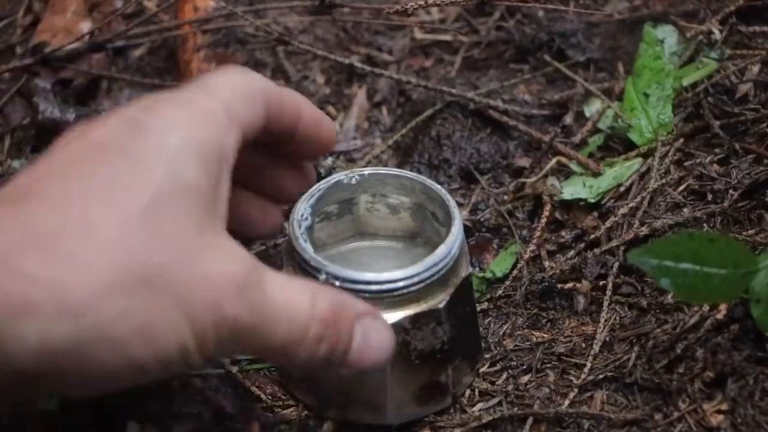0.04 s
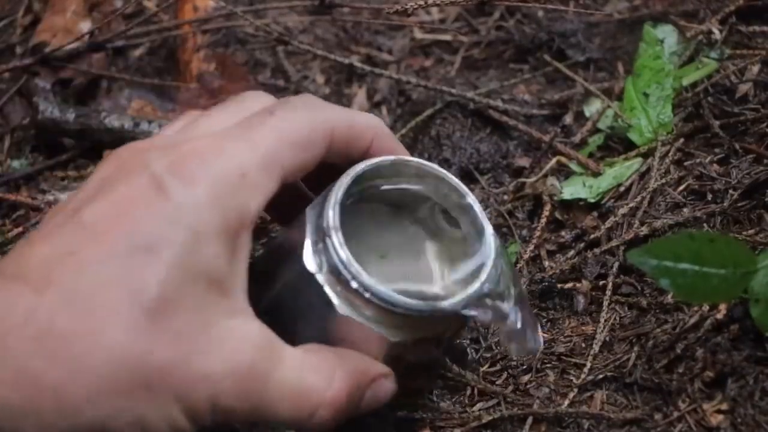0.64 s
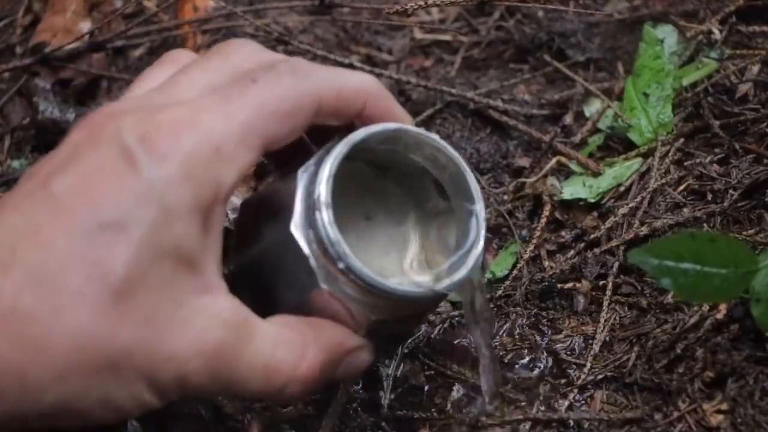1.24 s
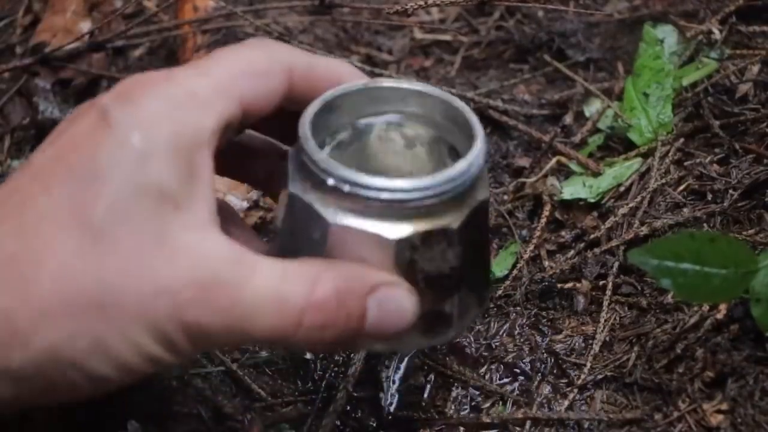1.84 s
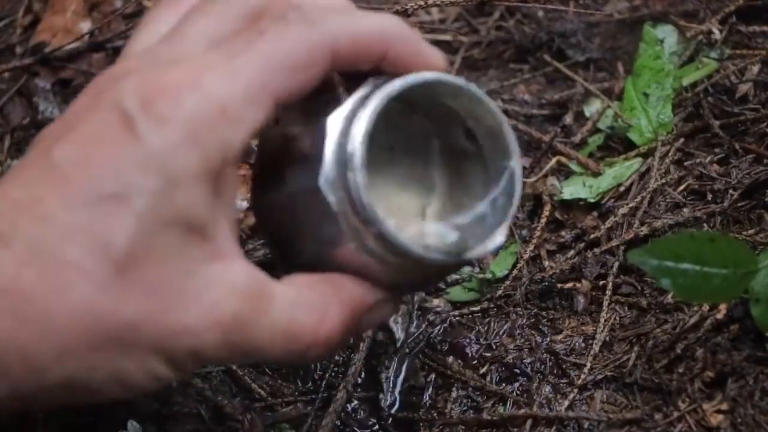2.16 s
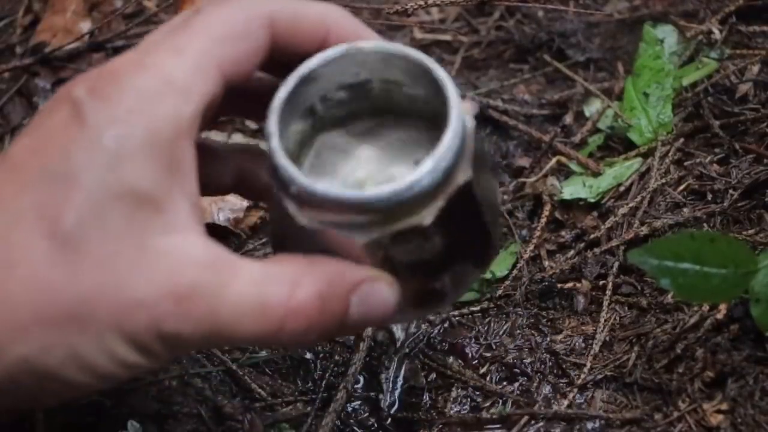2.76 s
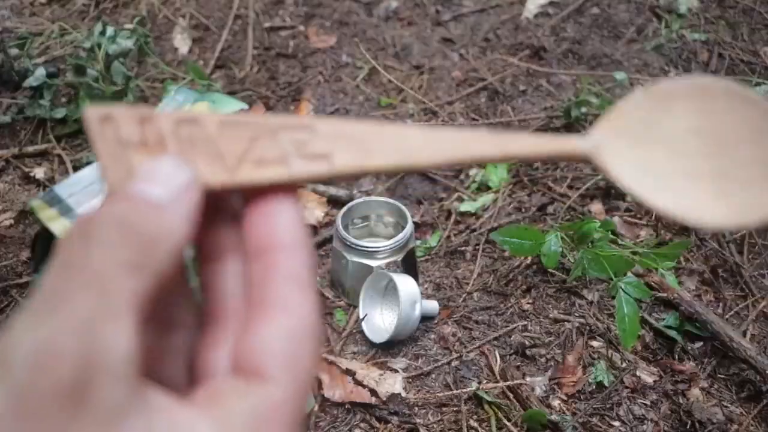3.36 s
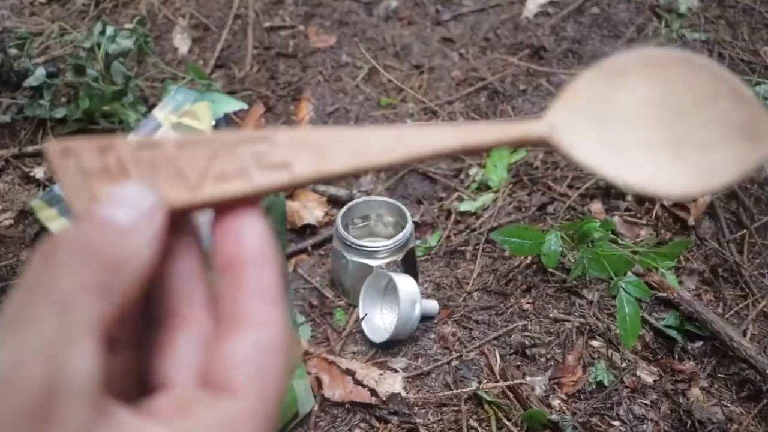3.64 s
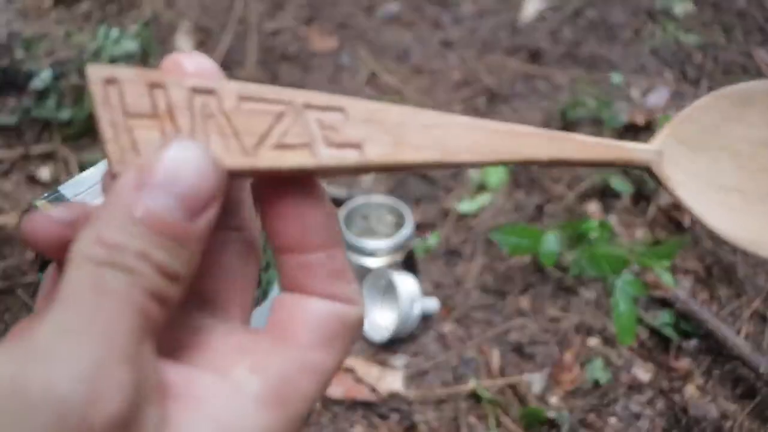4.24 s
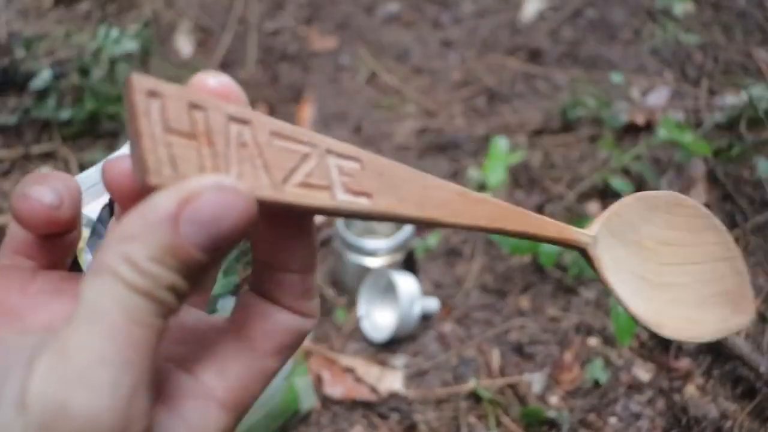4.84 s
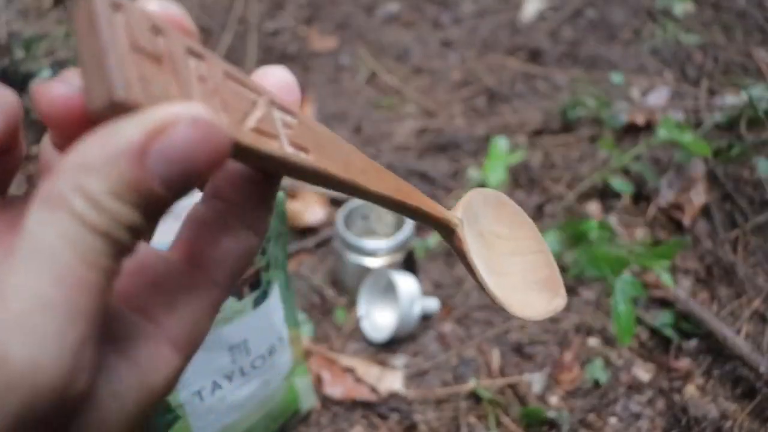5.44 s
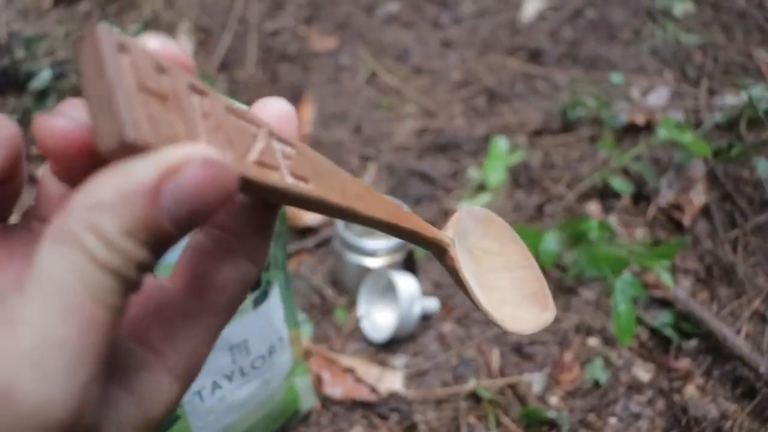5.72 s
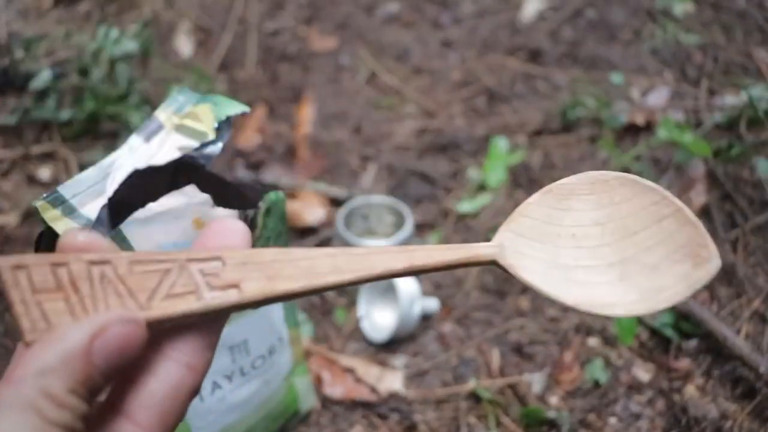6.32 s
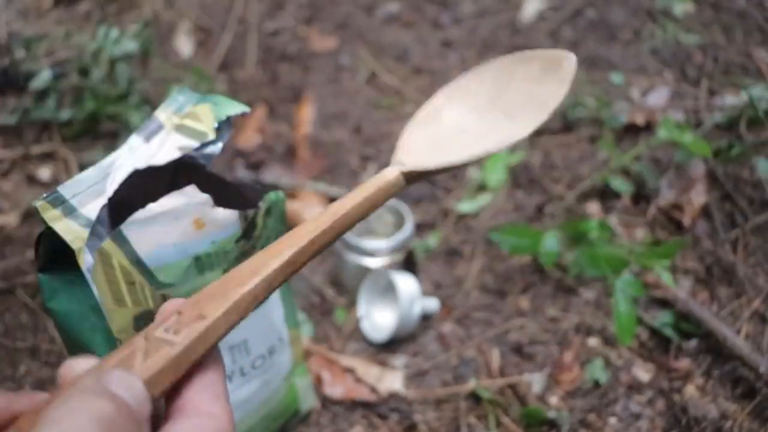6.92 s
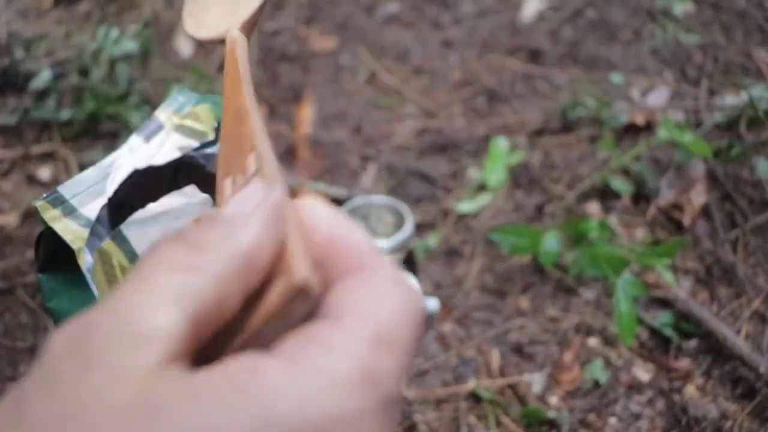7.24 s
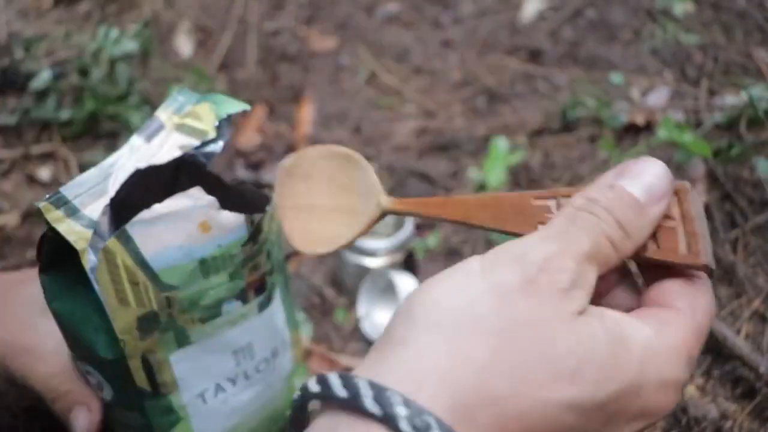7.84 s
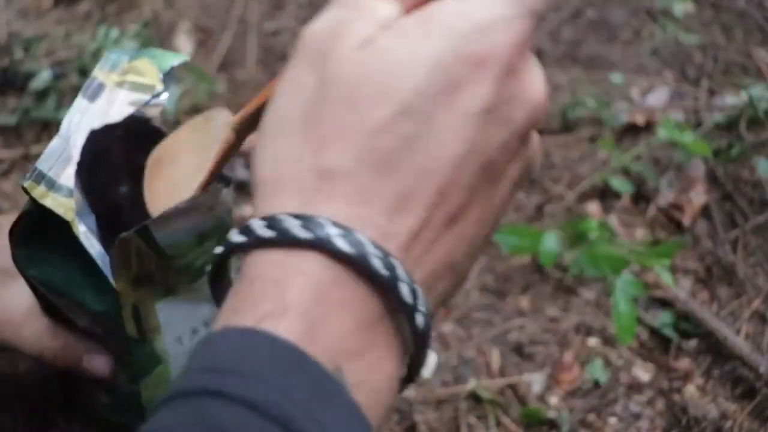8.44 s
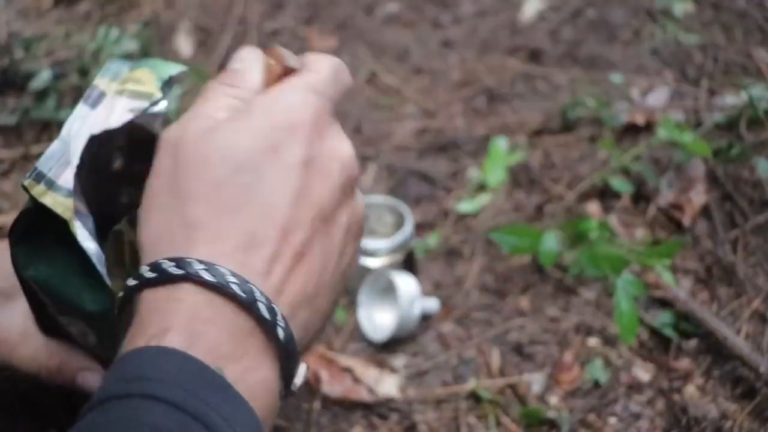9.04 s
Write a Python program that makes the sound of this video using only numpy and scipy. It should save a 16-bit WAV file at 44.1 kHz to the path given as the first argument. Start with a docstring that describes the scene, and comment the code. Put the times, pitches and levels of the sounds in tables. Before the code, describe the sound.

Water drops tap on leaves and litter throughout, close, sharp and irregular, with fainter drips further off. Beneath them lie a quiet woodland hush, the soft, dull patter of water poured on soil and an uneven low rumble on the microphone. In the first 1.2 seconds a small bird gives three rising whistles that echo among the trees. Another bird sings thin, very high, warbled falling notes on and off until about 5.5 seconds, with soft peeps and quick twitters continuing to about 8 seconds. One soft, dull knock comes at about 3 seconds. The drips bunch up and grow louder just before 4 seconds, with the hardest tap at about 4.5 and another strong one near 8. A foil bag starts rustling faintly at about 7.4 seconds, then crinkles in short, close crackles from 7.9 to 8.8 seconds.

```python
"""Dripping woodland

Drops fall from the canopy and tap on leaves and litter, with one soft, dull knock among them. A small
bird gives three rising whistles; another sings thin, high, warbled notes that hang among the trees.
Water is poured softly on the soil, a foil bag crinkles near the end, and a low rumble lies under it."""
import sys
import numpy as np
from scipy import signal
from scipy.fft import rfft, irfft, next_fast_len
from scipy.io import wavfile
from scipy.ndimage import uniform_filter1d

SR = 44100
rng = np.random.default_rng(int(sys.argv[2]) if len(sys.argv) > 2 else 0)


def inscribe(sig):
    """Save sig as 16-bit PCM at rate SR to the path in sys.argv[1].

    A 1-D sig is mono; a 2-D sig holds one channel per row.
    Samples are clipped to [-1, 1] before scaling.
    """
    pcm = np.round(np.clip(np.atleast_2d(sig).T, -1, 1) * 32767)
    wavfile.write(sys.argv[1], SR, pcm.astype(np.int16))


N = 400428
T = np.arange(N) / SR

# EQ of the rumble, the pouring, the hush of the wood and the echoes off the trees: f/Hz, gain/dB
RUMBLE_EQ = [(12, -14), (25, -2.5), (42, -2), (65, -6.5), (100, -15), (160, -21), (400, -82)]
POUR_EQ = [(50, -20), (115, 1), (180, -3), (280, -9), (420, -12), (800, -22.5), (2000, -39)]
HUSH_EQ = [(150, 9.5), (450, 0), (750, 2.5), (1050, 4), (1400, -1), (2200, -4), (4000, -7), (8000, -10.5),
           (12000, -19), (16000, -22)]
TREES_EQ = [(200, -28), (900, -8), (2500, 1.5), (8000, 5.5), (12000, 3.5), (16000, -13)]
# fader ride of the rumble: t/s, level/dB
RUMBLE_RIDE = [(0.0, -69), (0.15, -48), (2.15, -64), (2.65, -47), (2.98, -62.5), (3.61, -47.5), (3.97, -57),
               (4.07, -37.5), (4.35, -52.5), (4.42, -42), (4.78, -54), (7.21, -52.5), (7.43, -42),
               (8.52, -52.5), (8.7, -42.5), (9.08, -47)]
# fader rides of the bed: t/s, pouring level/dB, hush level/dB
BED_RIDES = [(0.0, -58.5, -58.5), (0.45, -57, -63), (1.16, -54, -63.5), (1.82, -57.5, -62.5),
             (7.05, -62, -59.5), (7.56, -57, -60), (8.07, -59.5, -57.5), (9.08, -60, -60.5)]
# fader ride of the bag's fine rustle: t/s, level/dB
RUSTLE_RIDE = [(7.1, -107), (7.4, -74), (8.1, -69), (8.26, -59), (8.55, -79), (9.08, -61)]
# folds of the bag giving way: t/s, level/dB, crispness at 2.6 kHz/dB, hollow f/Hz
FOLDS = [(7.9187, -0.5, -1.5, 1400), (7.9249, -2, -10, 1240), (8.0796, -1, -12, 1520),
         (8.094, -6.5, -3, 1290), (8.139, -6, -9, 1010), (8.163, 2.5, 3, 870), (8.3198, -1.5, -19.5, 1010),
         (8.3781, 6, -10, 1040), (8.809, -8.5, -7, 1080)]
# the low bird's whistles: t/s, pitch factor, level/dB
WHISTLE_CUES = [(.052, 1.01, -43), (.514, 0.98, -44), (1.083, .99, -46.5)]
# contour of one whistle: t/s from its start, f/Hz, relative level/dB
WHISTLE_SHAPE = [(0, 3000, -20), (.011, 2340, -15), (.04, 2230, -24), (.06, 2320, -11), (.078, 2414, -6.5),
                 (.099, 2660, -8), (.118, 2790, -4), (.135, 3130, -20)]
# the high bird's loud falling notes: t/s, start f/Hz, level/dB
SLUR_CUES = [(0.219, 8400, -55.5), (.48, 8560, -56), (1.86, 8430, -57.5), (2.151, 9100, -64.5),
             (2.498, 8760, -61), (2.725, 8580, -59.5), (2.965, 8570, -65.5), (4.804, 8570, -54.5),
             (5.439, 8300, -61)]
# its runs of soft peeps and its bursts of twitter: start t/s, end t/s, centre f/Hz, level/dB
PEEP_RUNS = [(0.724, 1.3, 7970, -72), (3.577, 3.8, 8300, -65.5), (4.092, 4.76, 8320, -64),
             (5.097, 5.2, 8030, -62), (5.358, 5.45, 7650, -61.5), (6.003, 6.1, 4670, -69),
             (7.251, 7.5, 6950, -66.5), (7.574, 7.68, 8180, -67), (7.871, 7.95, 8500, -65)]
TWITTER_RUNS = [(6.295, 6.5, 6260, -63), (6.491, 6.57, 7880, -63.5), (6.803, 7.01, 7900, -62)]
# near drops and one soft, dull knock (at 3.07 s):
# t/s, slap level/dB, thud over slap/dB, tick over slap/dB, ring f/Hz
DROPS_AND_KNOCK = [(0.1295, -1.5, 7, -0.5, 6700), (.1494, -13.5, -11, 3, 5260), (0.172, -7, -7, -7.5, 6500),
                   (0.5947, -18, 9, -3.5, 2400), (0.6045, -12.5, -1, -6, 1960), (0.8, -21, 4, -7, 2650),
                   (0.9854, -15.5, -5, -9.5, 2300), (1.16, -3.5, 0, -1.5, 8500),
                   (1.2816, -13, -10, -6.5, 2710), (1.4593, -10.5, 1, -3.5, 2740),
                   (1.7241, -10.5, -3, 13, 8000), (2.0527, -10, -5.5, -5.5, 8100),
                   (2.2502, -22.5, 3, -3, 5540), (2.4368, -6.5, 9, -5, 2530),
                   (2.6334, -7.5, -5.5, -12, 5800), (3.0725, -26, 17.5, -14, 1700),
                   (3.105, -2.5, -4, -10, 3300), (3.184, -13.5, 5.5, -14, 2500),
                   (3.4303, -11.5, 6, -10, 2490), (3.775, 3.5, 8.5, 2.5, 10400),
                   (3.7995, 0, -9.5, -12, 1720), (3.8768, 1, -8, -3.5, 5340), (3.9682, 1, -0.5, -7, 2600),
                   (4.1081, -20, 7, -11, 2600), (4.4093, -13, -17, -5.5, 5630), (4.4509, 18, 3, -4, 4800),
                   (4.889, -10, 4.5, -6.5, 4700), (5.045, -8.5, 8.5, -7.5, 8500),
                   (5.0848, -18, 4, -20, 1700), (5.1382, -7.5, -1, -11.5, 4700), (5.146, -16, -2, -8, 7900),
                   (5.5499, -12.5, 1, 2, 9900), (5.8451, -4.5, 1.5, -10.5, 3930),
                   (5.8618, -11, -9, -14, 5040), (5.8932, -8.5, 3, -18, 5100),
                   (6.047, -21, 9.5, -5.5, 4800), (6.3923, -3.5, -2.5, -3, 8700),
                   (7.145, -5, 2.5, -22, 2750), (7.3146, -3, -1.5, -9.5, 7150),
                   (7.623, -24.5, 14, -1, 5600), (7.9624, 7.5, -8, 0.5, 7250)]


def undb(db):
    """Decibels to gain."""
    return 10 ** (np.asarray(db) / 20)


def unit(x):
    """Scale to an rms of 1."""
    return x / np.sqrt(np.mean(x ** 2))


def add(out, s, x):
    """Mix x into out from time s."""
    i = max(int(s * SR), 0)
    out[i:i + len(x)] += x[:max(len(out) - i, 0)]


def gains(eq, size):
    """An EQ curve as gains on the bins of a transform."""
    hz, db = np.transpose(eq)
    bins_hz = np.arange(size // 2 + 1) * SR / size
    return undb(np.interp(np.log(bins_hz + 1), np.log(hz), db))


def colour(x, eq):
    """Run a long sound through an EQ curve."""
    size = next_fast_len(len(x))
    return irfft(rfft(x, size) * gains(eq, size), size)[:len(x)]


def pulse(eq, size=512):
    """The tightest click with this spectrum (minimum phase)."""
    cepstrum = irfft(np.log(gains(eq, size)))
    cepstrum[1:size // 2] *= 2
    cepstrum[size // 2 + 1:] = 0
    return irfft(np.exp(rfft(cepstrum)))


def drift(rate_hz):
    """Smooth random modulation with a spread near 1."""
    hold = int(SR / rate_hz)
    steps = np.repeat(rng.standard_normal(N // hold + 1), hold)
    return 1.17 * uniform_filter1d(uniform_filter1d(steps, hold), hold)[:N]


def burst(decay_s, grain, size=1400):
    """A dying shower of tiny unequal clicks, of energy 1."""
    t = np.arange(size) / SR
    x = rng.standard_normal(size) * np.exp(grain * rng.standard_normal(size) - t / decay_s)
    return x / np.linalg.norm(x)


def background():
    """The bed: rumble on the microphone, the soft patter of pouring, and the hush of the wood."""
    rumble, pour, hush = (unit(colour(rng.standard_normal(N), eq))
                          for eq in (RUMBLE_EQ, POUR_EQ, HUSH_EQ))
    s, pour_db, hush_db = np.transpose(BED_RIDES)
    rumble *= undb(np.interp(T, *np.transpose(RUMBLE_RIDE)) + 0.93 + 1.5 * drift(9.3))
    pour *= undb(np.interp(T, s, pour_db) + 0.5 + 1.75 * drift(40))
    hush *= undb(np.interp(T, s, hush_db) + 2)
    return rumble + pour + hush


def trees(x, t60_s, wet_db, attack_s=0.00077):
    """Trunks and foliage scatter the sound back as a fading wash of echoes."""
    t = np.arange(SR) / SR
    envelope = undb(-60 * t / t60_s) * (1 - np.exp(-t / attack_s))
    echoes = colour(rng.standard_normal(SR) * envelope, TREES_EQ)
    return undb(wet_db) * signal.fftconvolve(x, echoes / np.linalg.norm(echoes))[:N]


def ground(x, delay_s=0.0092, echo_db=-22):
    """The rough ground returns one thin, smeared echo."""
    out = np.zeros(N)
    litter = np.convolve(pulse([(600, 0.5), (2000, 1), (9000, -1), (16000, 0)]),
                         burst(0.0022, grain=0.27))
    add(out, delay_s, undb(echo_db) * signal.fftconvolve(x, litter)[:N])
    return out


def foil_bag(decay_s=0.0019, attack_s=0.0028, pull_s=(8.17, 8.37), count=6):
    """Each fold buckles in a short crackle, coloured by the bag's hollow, over a fine foil rustle."""
    out = np.zeros(N)
    # small folds give way at random as the bag is pulled open
    times, scatter = rng.uniform(*pull_s, count), rng.uniform(-1, 1, (count, 2))
    small_folds = [(s, -11.5 + 2 * size, -12.5, 860 * 2 ** (0.25 * pitch))
                   for s, (size, pitch) in zip(times, scatter)]
    for s, low_db, crisp_db, hz in FOLDS + small_folds:
        mid_db = low_db + crisp_db
        hollow = pulse([(hz / 6, low_db - 12), (hz / 2, low_db - 7), (0.97 * hz, low_db + 4.5),
                        (hz, low_db + 3.5), (1.72 * hz, (low_db + mid_db) / 2 - 7.5),
                        (2600, mid_db), (7000, mid_db - 13.5), (16000, mid_db - 34.5)])
        crackle = burst(decay_s, grain=0.51)
        crackle *= np.minimum(np.arange(1, len(crackle) + 1) / (attack_s * SR), 1)
        add(out, s, np.convolve(hollow, crackle / np.linalg.norm(crackle)))
    grains = rng.standard_normal(N) * np.exp(0.56 * rng.standard_normal(N) + 0.5 * drift(110))
    rustle = unit(colour(grains, [(300, -15), (900, 13.5), (2000, 4), (7000, 0), (16000, -27)]))
    return out + rustle * undb(np.interp(T, *np.transpose(RUSTLE_RIDE)))


def whistling_bird(waver=0.009):
    """A pure, slightly unsteady tone that dips, then swells as it climbs."""
    out = np.zeros(N)
    s, shape_hz, shape_db = np.transpose(WHISTLE_SHAPE)
    t = np.arange(int(s[-1] * SR)) / SR
    for start, pitch, level_db in WHISTLE_CUES:
        hz = pitch * np.interp(t, s, shape_hz) * (1 + waver * drift(119)[:len(t)])
        tone = np.sqrt(2) * np.sin(2 * np.pi * np.cumsum(hz) / SR)
        add(out, start, tone * undb(level_db + np.interp(t, s, shape_db)))
    return out


def song(slur_s=0.115, peep_s=0.096, peep_every_s=0.135, chip_s=0.0277, chip_every_s=0.038):
    """The high bird's slurs, peeps and chips: t/s, length/s, start f/Hz, end f/Hz, level/dB."""
    notes = [(s, slur_s, hz, 0.86 * hz, db) for s, hz, db in SLUR_CUES]
    for start, end, hz, db in PEEP_RUNS:  # each peep sags a little
        times = np.arange(start, end, peep_every_s)
        pitches = hz * (1 + 0.019 * rng.standard_normal(16))
        notes += [(s, peep_s, f, 0.958 * f, db) for s, f in zip(times, pitches)]
    for start, end, hz, db in TWITTER_RUNS:  # each chip slides up or down at random
        times = np.arange(start, end, chip_every_s)
        glides = hz * (1 + 0.0585 * rng.standard_normal((16, 2)))
        notes += [(s, chip_s, *glide, db) for s, glide in zip(times, glides)]
    return notes


def warbling_bird(warble_hz=62, depth=0.038, throb=0.26, rasp=0.01):
    """Thin, raspy sliding notes; the wider the slide, the deeper the quick saw-like warble on it."""
    out = np.zeros(N)
    waver, flicker, jitter = drift(90), drift(150), drift(900)
    for s, length_s, start_hz, end_hz, db in song():
        progress = np.linspace(0, 1, int(length_s * SR))
        span = slice(int(s * SR), int(s * SR) + len(progress))
        cycle = 2 * np.pi * np.cumsum(warble_hz * (1 + 0.26 * waver[span])) / SR
        swing = depth * np.clip(abs(start_hz - end_hz) / 1000, 0.45, 1)
        warble = swing * (np.sin(cycle) + 0.26 * np.sin(2 * cycle))
        hz = (start_hz + (end_hz - start_hz) * progress) * (1 + warble + rasp * jitter[span])
        swell = np.sqrt(4 * progress * (1 - progress))
        tremolo = (1 - throb * np.cos(cycle)) * undb(3.1 * flicker[span])
        tone = 1.696 * np.sin(2 * np.pi * np.cumsum(hz) / SR)
        add(out, s, undb(db) * swell * tremolo * tone)
    return out


def ring(hz, decay_s=0.00033, size=700):
    """A quickly damped resonance, as of a wet leaf, with a gain near 1 at its pitch."""
    t = np.arange(size) / SR
    return 2 / (decay_s * SR) * np.exp(-t / decay_s) * np.sin(2 * np.pi * hz * t)


def tap(thud_db, slap_db, tick_db, spatter_db, ring_hz, spatter_delay_s=0.0003):
    """One hit, as of a drop on a leaf: a sharp push, a brief ring, then a few ms of brighter spatter."""
    push = pulse([(60, thud_db - 7), (250, thud_db - 2.5), (700, thud_db + 1), (1100, thud_db - 2.5),
                  (1500, (thud_db + slap_db) / 2 - 8), (2400, slap_db + 2), (3200, slap_db - 4),
                  (4800, (slap_db + tick_db) / 2 + 1), (8500, tick_db + 0.5), (16000, tick_db - 16.5)])
    spray = pulse([(100, thud_db - 15), (600, thud_db), (1400, slap_db - 7.5), (2600, slap_db - 5),
                   (8000, tick_db + 3.5), (11000, tick_db), (16000, tick_db - 5)])
    spatter = undb(spatter_db) * np.convolve(spray, burst(0.002, grain=0.31))
    ring_db = 2 + np.interp(ring_hz, [2500, 8000], [slap_db, tick_db])
    out = np.pad(spatter, (int(spatter_delay_s * SR), 0))
    add(out, 0, -push)
    add(out, 0, -undb(ring_db) * ring(ring_hz))
    return out / np.sqrt(1 + undb(2 * spatter_db))


def drops_and_knock(far_count=60, far_leaf_hz=4500, spread_oct=0.6):
    """Near drops and one soft, dull knock sit up front; faint drops land at random further off."""
    out = np.zeros(N)
    for s, db, thud_db, tick_db, ring_hz in DROPS_AND_KNOCK:
        spatter_db = -5 - 0.28 * (db + tick_db)  # the sharper the tick, the cleaner the crack
        add(out, s, tap(db + thud_db, db, db + tick_db, spatter_db, ring_hz))
    times = rng.uniform(0, N / SR, far_count)
    scatter = np.clip(rng.standard_normal((far_count, 3)), -2, 2)
    for s, (size, tilt, pitch) in zip(times, scatter):
        db = -33 + 3.5 * size
        leaf_hz = far_leaf_hz * 2 ** (spread_oct * pitch)
        add(out, s, tap(db - 2, db + 2 * tilt, db - 2 * tilt, 0, leaf_hz))
    return out


def scene():
    """The taps stay almost dry and the bag is closer still; the birds sit back and trail echoes."""
    taps, low_bird, high_bird = drops_and_knock(), whistling_bird(), warbling_bird()
    out = taps + ground(taps) + trees(taps, t60_s=0.42, wet_db=-30) + foil_bag()
    out += low_bird + trees(low_bird, t60_s=0.62, wet_db=1.5)
    out += high_bird + trees(high_bird, t60_s=0.66, wet_db=-6)
    return (out + background())[None]


def record(dry, top_hz=16200):
    """Soft saturation rounds off the hardest taps; a steep low-pass cuts the top."""
    lowpass = signal.ellip(10, 0.2, 80, top_hz, fs=SR, output="sos")
    return signal.sosfilt(lowpass, 1.32 * np.tanh(dry / 1.277))


dry = scene()
out = record(dry)
inscribe(out)
```